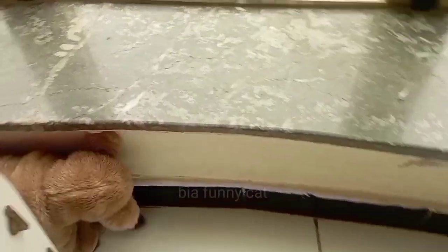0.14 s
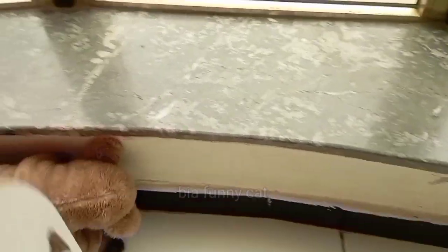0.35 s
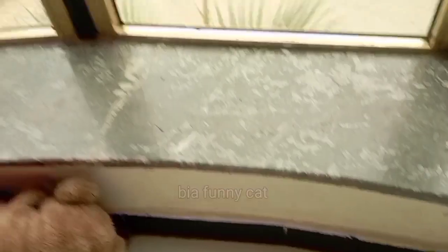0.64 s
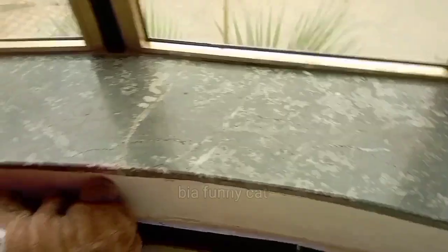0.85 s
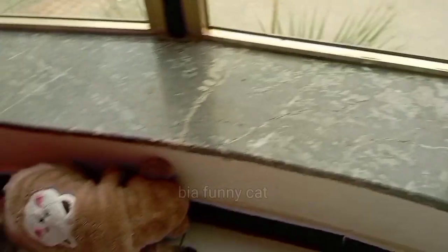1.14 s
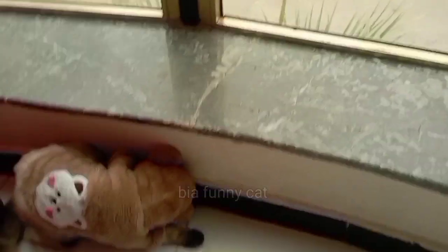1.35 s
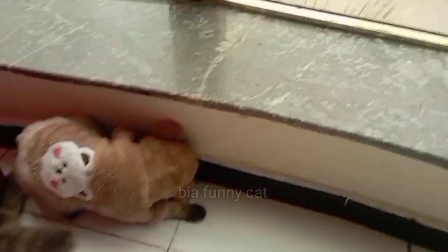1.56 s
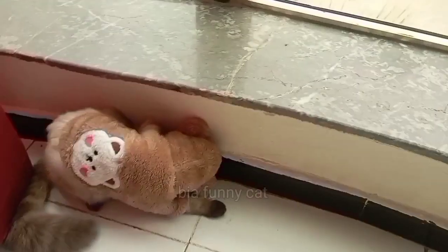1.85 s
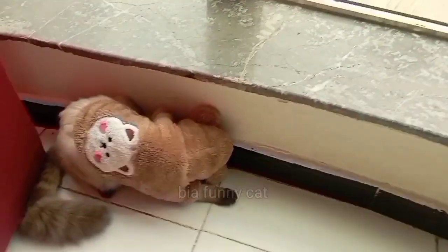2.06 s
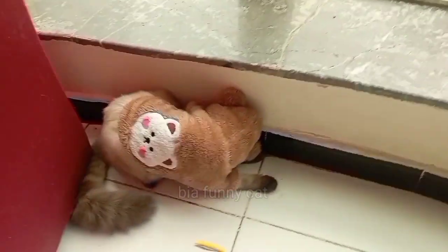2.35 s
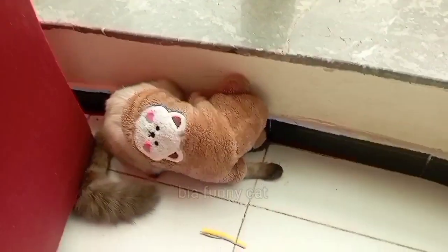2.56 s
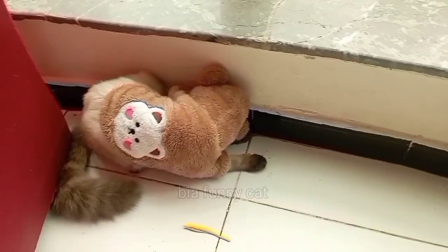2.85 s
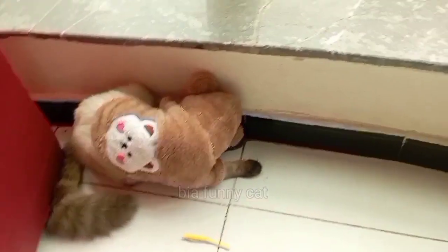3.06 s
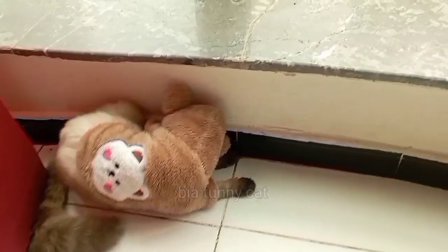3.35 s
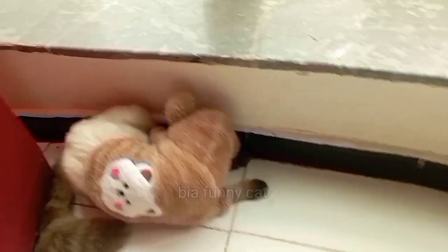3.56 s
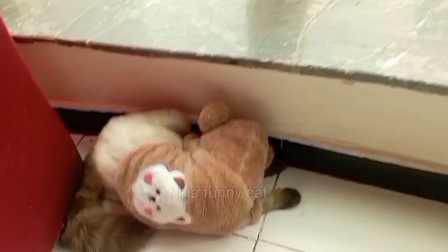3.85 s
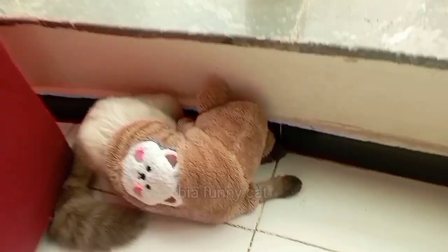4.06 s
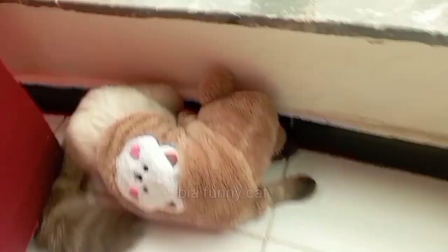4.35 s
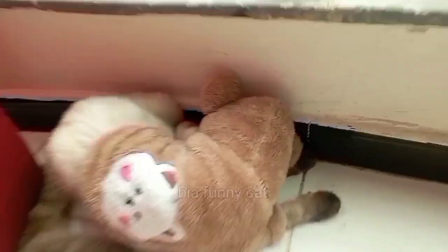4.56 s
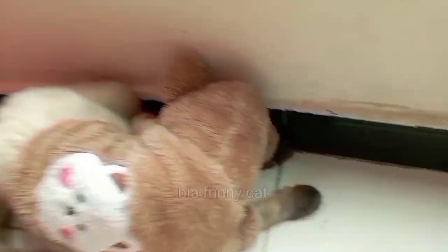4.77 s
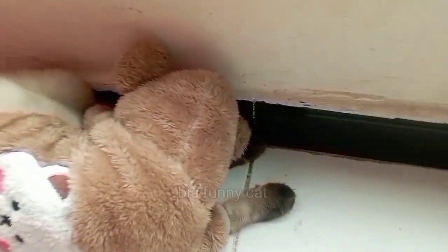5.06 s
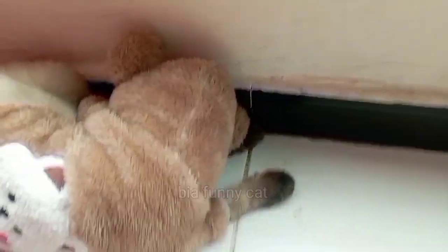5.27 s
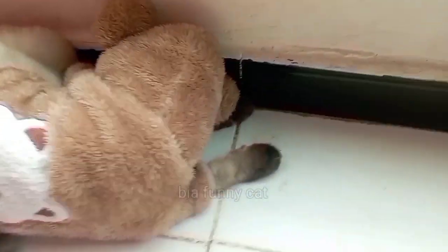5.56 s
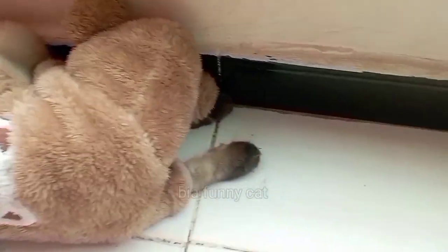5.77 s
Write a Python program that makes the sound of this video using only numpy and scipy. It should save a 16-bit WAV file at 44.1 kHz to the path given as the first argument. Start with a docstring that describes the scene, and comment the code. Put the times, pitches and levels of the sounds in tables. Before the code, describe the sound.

A cat paws and scuffs at a wall indoors, with soft thuds, claw ticks, a small toy bouncing on tile and microphone bumps.

```python
"""A cat pawing at a wall

A cat in a plush coat reaches into a gap at the foot of a wall: paws thud on the skirting and scuff,
claws tick, fur and flank rub. A small light toy drops and bounces on the tiles, and the hard room
reverberates briefly. A finger half covers the hand-held phone's right port, shading and bumping it."""
import sys
import numpy as np
from scipy import signal
from scipy.fft import rfft, irfft
from scipy.io import wavfile
from scipy.ndimage import uniform_filter1d

SR = 44100
rng = np.random.default_rng(int(sys.argv[2]) if len(sys.argv) > 2 else 0)


def store_pcm(level_fs):
    """Save levels as 16-bit WAV."""
    pcm = np.round(np.clip(level_fs, -1, 1) * 32767).astype(np.int16)
    wavfile.write(sys.argv[1], SR, np.atleast_2d(pcm).T)


N = 261072
TIME = np.arange(N) / SR
RING = 4096  # samples in one impulse response
BINS_HZ = np.fft.rfftfreq(RING, 1 / SR) + 1


def undb(db):
    """Decibels to amplitude ratio."""
    return 10 ** (np.asarray(db) / 20)


def unit(x):
    """Scale to rms 1."""
    return x / np.sqrt(np.mean(x ** 2))


def along(points, size, column=1):
    """Interpolate a table column over log frequency at the bins of an FFT."""
    points = np.array(points)
    bins_hz = np.fft.rfftfreq(size, 1 / SR) + 1
    return np.interp(np.log(bins_hz), np.log(points[:, 0]), points[:, column])


def colour(x, spectrum):
    """Zero-phase filtering gives a steady sound its spectrum."""
    return irfft(rfft(x) * undb(along(spectrum, N)), N)


def noise(spectrum):
    """Filtered Gaussian noise of rms 1."""
    return unit(colour(rng.standard_normal(N), spectrum))


def response(spectrum, shape_db=0):
    """Minimum-phase impulse response with this spectrum plus shape_db."""
    cepstrum = irfft(np.log(undb(along(spectrum, RING) + shape_db)))
    cepstrum[1:RING // 2] *= 2
    cepstrum[RING // 2 + 1:] = 0
    return irfft(np.exp(rfft(cepstrum)))


def resonance(hz, width, peak_db):
    """A resonance peak in dB; its width is a fraction of its frequency."""
    return peak_db / (1 + (2 * np.log(BINS_HZ / hz) / width) ** 2)


def through(x, ring):
    """Convolution: x drives a linear system."""
    return signal.fftconvolve(x, ring)[:len(x)]


def walk(rate_hz):
    """Smooth random fluctuation of rms 1."""
    size = int(SR / rate_hz)
    steps = np.repeat(rng.standard_normal(N // size + 1), size)[:N]
    return unit(uniform_filter1d(steps, size))


def contact(slip_s, slip_db):
    """Stick-slip force: one impulse, then a train of tiny slips that swells and dies."""
    age = np.arange(RING) / (SR * slip_s)
    chance = rng.standard_normal(RING)
    slips = chance * np.abs(chance) * np.sqrt(age) * np.exp(-age)
    force = undb(slip_db) * slips / np.linalg.norm(slips)
    force[0] += 1
    return force


def add(track, start_s, level_db, sound):
    """Place a transient; its level is its energy spread over 10 ms."""
    start = int(start_s * SR)
    sound = sound * undb(level_db) * np.sqrt(SR / 100) / np.linalg.norm(sound)
    track[start:start + RING] += sound[:N - start]


def air(level_db):
    """Ambient noise: the steady, low background of a quiet room."""
    # background spectrum: frequency_hz, gain_db
    spectrum = [(20, -17), (60, -9.5), (140, 5.5), (230, -11.5), (350, -9), (550, -16), (900, -29.5),
                (2000, -33.5), (6000, -41.5), (15500, -47)]
    return undb(level_db) * noise(spectrum)


def rubbing(column, release_s, fidget_db, attack_s=0.036, pause_db=-10, pause_fade_s=0.08):
    """Friction envelope: the cat's reaches add in power to its fidgeting, which fades in the pauses."""
    # reaches into the gap, at relative levels: start_s, length_s, fur_db, body_db
    reaches = [(0, .05, -63, -50.5), (0.055, 0.055, -58, -45.5), (0.276, 0.3, -62, -54.5),
               (0.538, 0.092, -56.5, -42), (.85, 0.25, -62.5, -39.5), (1.166, 0.091, -59, -37.5),
               (1.406, 0.069, -62, -53), (1.518, 0.11, -56, -43), (1.713, 0.17, -56, -50),
               (2.537, 0.049, -64.5, -41), (2.748, 0.023, -63, -38.5), (2.97, 0.046, -60.5, -40),
               (3.2, 0.073, -68.5, -57), (3.62, 0.047, -64, -56), (4.1, 0.17, -68.5, -68),
               (4.614, 0.11, -67.5, -59.5), (5.466, 0.052, -65, -74)]
    # the cat keeps still: start_s, end_s
    pauses = [(2.02, 2.415), (5.37, 5.44), (5.61, 5.73)]
    still = sum(1. * ((TIME > start) & (TIME < end)) for start, end in pauses)
    power = undb(fidget_db + pause_db * uniform_filter1d(still, int(pause_fade_s * SR))) ** 2
    for reach in reaches:
        start_s, length_s = reach[:2]
        age = TIME - start_s
        attack = np.clip(1 + age / attack_s, 0, 1)
        release = np.exp(-np.maximum(age - length_s, 0) / release_s)
        power += (undb(reach[column]) * attack * release) ** 2
    return np.sqrt(power)


def fur(catches_per_s=200, spread_db=4, flicker_db=2, grain_db=-3):
    """Friction noise: fibres catch and let go at random over a smooth hiss."""
    # hiss of the coat: frequency_hz, gain_db
    spectrum = [(400, -4), (1200, -2), (3200, -1), (5800, -4), (8500, -5), (10600, 0), (12500, -4.5),
                (15500, -5)]
    sizes = undb(spread_db * np.minimum(rng.exponential(size=N), 3))
    catches = (rng.random(N) < catches_per_s / SR) * sizes * rng.choice([-1, 1], N)
    grains = through(catches, contact(slip_s=0.0008, slip_db=3))
    friction = rng.standard_normal(N) + undb(grain_db) * unit(grains)
    hiss = unit(colour(friction, spectrum)) * undb(flicker_db * walk(45))
    return hiss * rubbing(column=2, release_s=0.04, fidget_db=-69)


def scattered_fur():
    """Scattering off wall and floor carries the coat's hiss to the shaded port."""
    # scattered path: frequency_hz, gain_db
    path = [(1000, 2.1), (3500, 5.9), (7000, 6.9), (10500, 0.5), (15000, 7.1)]
    return colour(fur(), path)


def shuffle(flicker_db=2.5):
    """Sliding friction: the cat's body drags unevenly along the skirting."""
    # rub of the flank: frequency_hz, gain_db
    spectrum = [(40, -10.5), (130, 0), (250, 3.5), (400, -2), (600, -5), (850, -17.5), (1500, -27),
                (3000, -40), (8000, -56.5)]
    drag = noise(spectrum) * undb(flicker_db * walk(35))
    return drag * rubbing(column=3, release_s=0.075, fidget_db=-65.5)


def hand(rest_db=-55.5, wander_db=2, squeeze_sigma_s=0.049, flicker_db=2.5, gain_db=2.5):
    """Structure-borne rumble follows the grip, which wanders slowly and swells at each squeeze."""
    # rumble of the hand: frequency_hz, gain_db
    spectrum = [(20, -30), (45, -1), (85, 0.5), (125, 0), (190, -8.5), (300, -23), (550, -36.5),
                (1000, -45), (4000, -58.5)]
    # the hand tightens: peak_s, relative_level_db
    squeezes = [(.33, -48.5), (.57, -49), (.86, -47), (1.22, -45), (1.47, -48), (2.3, -53.5), (2.5, -50),
                (3.42, -38.5), (3.9, -51.5), (4.57, -46.5), (5.08, -52.5), (5.7, -50)]
    rumble = noise(spectrum)
    swells = sum(undb(db) * np.exp(-0.5 * ((TIME - s) / squeeze_sigma_s) ** 2) for s, db in squeezes)
    grip = np.hypot(undb(rest_db + wander_db * walk(10)), swells)
    return rumble * grip * undb(gain_db + flicker_db * walk(25))


def finger(lag_hz=600):
    """Stick-slip of skin at the right port presses low bumps into it, over the hand's rumble."""
    # finger contacts: start_s, level_db, tilt_db_per_octave, cutoff_hz
    bumps = [(0.278, -36.5, -5, 500), (.317, -33, -0.5, 450), (.554, -35, -2, 496), (1.126, -42, 7.5, 450),
             (1.138, -39.5, 2.5, 860), (1.214, -42, 1, 504), (1.71, -36.5, -4.5, 500),
             (2.013, -41, -5.5, 350), (2.442, -35, 3.5, 670), (2.602, -19, -0.5, 940),
             (3.33, -39.5, 1, 600), (3.389, -16, -2, 950), (3.43, -34, 2, 820), (3.446, -25, -1, 680),
             (3.484, -42, -0.5, 1160), (3.757, -37.5, -9, 298), (3.846, -39.5, 0, 780),
             (4.023, -37.5, -1, 1830), (4.082, -39.5, -1, 1600), (4.128, -48, 2, 1490),
             (4.176, -45, 3.5, 850), (4.233, -36.5, 2, 800), (4.244, -48.5, 3, 1620), (4.258, -8, -1, 2700),
             (4.308, -20, -4, 980), (4.501, -34, -0.5, 550), (4.575, -28, 2, 440), (4.656, -12, -2, 2000),
             (4.84, -43.5, 1.5, 600), (4.886, -37, 0, 350), (5.673, -47.5, 4.5, 700),
             (5.705, -40, 5.5, 500)]
    # pressure pulse in the port: frequency_hz, gain_db
    spectrum = [(20, -66.5), (45, -19), (75, -6), (98, 1), (125, 1.5), (155, -4.5), (200, -11),
                (320, -13.5), (500, -21.5), (700, -30.5), (1400, -34), (2600, -43.5), (4200, -58),
                (15000, -99.5)]
    out = hand()
    for start_s, level_db, tilt, cutoff_hz in bumps:
        softness_db = -10 * np.log10(1 + (BINS_HZ / cutoff_hz) ** 8)
        add(out, start_s, level_db, response(spectrum, tilt * np.log2(BINS_HZ) + softness_db))
    # all-pass delay: the fingertip gives way, so the low push comes just after the first touch
    pole = np.exp(-2 * np.pi * lag_hz / SR)
    return signal.lfilter([pole, -1], [1, -pole], out)


def paws(longest_slip_s=0.0078, doubling_db=19, pad_hz=650):
    """Cushioned impact: a soft pad low-passes each thud, then skids, longer after harder blows."""
    # blows on skirting and floor: start_s, level_db, tilt_db_per_octave, pitch_hz
    blows = [(0.085, -48.5, 4, 312), (0.157, -46, 2, 400), (0.369, -48.5, 1, 263), (0.496, -41.5, -1, 580),
             (0.539, -40.5, -3.5, 243), (.585, -45, 3, 254), (0.742, -37.5, -1, 247), (0.873, -49, -7, 300),
             (0.919, -39.5, -0.5, 194), (0.996, -36.5, -3, 243), (1.035, -40.5, -4, 250),
             (1.185, -38.5, -1.5, 256), (1.248, -33, 1, 322), (1.261, -39.5, -11.5, 109),
             (1.522, -38.5, -9, 278), (1.563, -35, 0.5, 405.5), (1.624, -46, -5.5, 230),
             (1.713, -42.5, 5.5, 302), (2.494, -41, 3, 303), (2.506, -33.5, -0.5, 315),
             (2.735, -31, 2, 275), (2.743, -30.5, -6, 161), (2.769, -36.5, -1, 183), (2.783, -39, 1.5, 247),
             (2.969, -27, 1, 233), (2.978, -34.5, 0, 240), (3.012, -33.5, -0.5, 239),
             (3.142, -41.5, -1.5, 480), (3.226, -41.5, 0, 410), (3.658, -46, 3.5, 420)]
    # response of the skirting: frequency_hz, gain_db
    skirting = [(12, -74.5), (40, -38.5), (110, -12), (220, -4), (310, -4.5), (430, -6.5), (570, -4),
                (760, -9.5), (1300, -20.5), (2500, -30), (5000, -40.5), (15000, -50)]
    out = np.zeros(N)
    padding_db = -10 * np.log10(1 + (BINS_HZ / pad_hz) ** 4)
    hardest_db = max(blow[1] for blow in blows)
    for start_s, level_db, tilt, pitch_hz in blows:
        spot_db = tilt * np.log2(BINS_HZ) + resonance(pitch_hz, width=0.31, peak_db=10.5)
        thud = response(skirting, spot_db + padding_db)
        slip_s = longest_slip_s * 2 ** ((level_db - hardest_db) / doubling_db)
        skid = through(contact(slip_s, slip_db=9), response(skirting, spot_db))
        add(out, start_s, level_db, unit(thud) + unit(skid))
    return out


def scuffs():
    """Stick-slip friction: brief dry scrapes of a paw, each with its own pitch."""
    # paw scrapes: start_s, level_db, pitch_hz
    scrapes = [(0.088, -54.5, 1390), (0.37, -63, 2980), (0.742, -56.5, 750), (0.873, -52.5, 1230),
               (0.923, -51.5, 1420), (.937, -54, 1400), (0.994, -51, 1790), (1.247, -52.5, 715),
               (1.52, -41.5, 3450), (1.562, -45, 1080), (1.621, -42, 3700), (1.715, -46.5, 2780),
               (2.507, -46, 1420), (2.737, -51, 1720), (3.138, -55.5, 1140), (4.169, -60, 1440),
               (4.59, -57, 1900), (4.661, -58.5, 3260), (4.71, -61, 2720), (4.762, -53.5, 2680),
               (4.831, -61, 1100), (4.943, -52, 2450), (5.236, -63, 4570)]
    # spectrum of a scrape: frequency_hz, gain_db
    spectrum = [(300, -9), (900, -3), (1700, -6.5), (2600, -13), (3900, -13), (5500, -21), (10000, -20),
                (15000, -38.5)]
    out = np.zeros(N)
    for start_s, level_db, pitch_hz in scrapes:
        ring = response(spectrum, resonance(pitch_hz, width=0.3, peak_db=10))
        add(out, start_s, level_db, through(contact(slip_s=0.0051, slip_db=11), ring))
    return out


def claws(gain_db=-3.5):
    """Hard impact: the brief sliding contact of claw on tile gives a tick."""
    # claw strikes: start_s, relative_level_db
    ticks = [(.101, -54.5), (.349, -50.5), (.368, -50), (.4958, -33), (.4982, -31.5), (.542, -39),
             (.588, -49.5), (.63, -48), (.818, -53.5), (.839, -51), (.875, -54), (.994, -62),
             (1.247, -49.5), (1.521, -28.5), (1.623, -55), (1.723, -46.5), (2.496, -52.5), (2.734, -56),
             (2.977, -42.5), (3.418, -63), (3.479, -60.5), (5.24, -58.5), (5.287, -64), (5.36, -63.5),
             (5.498, -53), (5.527, -53.5), (5.547, -57.5), (5.593, -61), (5.787, -64), (5.812, -62),
             (5.877, -70)]
    # spectrum of a bright claw tick as heard at the left port: frequency_hz, gain_db
    spectrum = [(300, -27), (1500, -6), (3200, -10), (6000, -8.5), (8200, -2), (9800, 9), (11200, 6.5),
                (12500, 2.5), (15500, -12.5)]
    ring = response(spectrum)
    out = np.zeros(N)
    for start_s, level_db in ticks:
        add(out, start_s, level_db + gain_db, through(contact(slip_s=0.0021, slip_db=15), ring))
    return out


def toy(dulling_db_per_db=0.39):
    """Impact: each bounce gives a dry crack, a ring near 1 kHz and bright peaks; weak hops are duller."""
    # the toy lands on both ends, then hops: start_s, level_db
    hops = [(1.7422, -24.5), (1.744, -26), (1.8145, -35), (1.8774, -42), (1.9275, -55)]
    # peaks in the bounce's clack: frequency_hz, bandwidth_hz, peak_db
    peaks = [(1072, 77, 3.5), (2890, 99, 2), (3520, 220, 2.5), (4450, 300, -2), (6980, 400, 9),
             (7720, 160, 5), (8140, 180, 9.5), (10130, 2600, 8), (12300, 300, 2), (14200, 770, -10)]
    # crack of the impact: frequency_hz, gain_db
    crack = [(300, -12), (1000, -6.5), (1450, -17), (2500, -7), (4200, 5), (5400, -4), (6800, -4.5),
             (10500, 11.5), (12500, 1), (15500, -19)]
    t = TIME[:RING]
    ringing = np.zeros(RING)
    for k, (frequency_hz, bandwidth_hz, peak_db) in enumerate(peaks):
        decay = undb(peak_db) * bandwidth_hz * np.exp(-np.pi * bandwidth_hz * t)
        ringing += (-1) ** k * decay * np.sin(2 * np.pi * frequency_hz * t)
    clack = unit(ringing) + unit(response(crack))
    out = np.zeros(N)
    hardest_db = max(hop[1] for hop in hops)
    for start_s, level_db in hops:
        treble_db = dulling_db_per_db * (level_db - hardest_db)
        softness = response([(1000, 0.00077), (10000, treble_db)])
        force = through(contact(slip_s=0.00089, slip_db=-6), softness)
        add(out, start_s, level_db, through(force, clack))
    return out


def room(x, column, build_s=0.0017, size=256):
    """Diffuse reverberation of tile and glass at one port; the middle frequencies last longest."""
    # reverberation: frequency_hz, left_gain_db, right_gain_db, t60_s
    bands = [(80, -0.5, -9.5, 0.17), (242, 2, -13.5, 0.59), (592, -6.5, -20, 0.71), (1200, -5, -26, 0.65),
             (3425, -12, -17.5, 0.53), (7000, -16.5, -26.5, .5), (10500, -12.5, -33, 0.35),
             (15000, -23, -18.5, 0.26)]
    _, t, cells = signal.stft(rng.standard_normal(SR), SR, nperseg=size)
    t60_s = along(bands, size, column=3)[:, None]
    fade = np.exp(-np.log(1000) * t / t60_s) * (1 - np.exp(-t / build_s))
    fade /= np.sqrt(SR * np.mean(fade ** 2, axis=1, keepdims=True))
    gain = undb(along(bands, size, column))[:, None]
    tail = signal.istft(cells * fade * gain, SR)[1]
    return through(x, tail)


def shaded(x):
    """Acoustic shadowing: the finger over the port blocks more treble than bass."""
    # transmission of the half-covered port: frequency_hz, gain_db
    transmission = [(60, -7), (230, -5.5), (500, -12.5), (1200, -19.5), (3500, -23.5), (7000, -25),
                    (10500, -37.5), (15000, -20)]
    return through(x, response(transmission))


def scene():
    """Superposition at two ports: the left is open; the right is shaded, with the finger on top."""
    direct = claws() + paws() + scuffs() + toy() + undb(-1) * fur() + undb(-7) * shuffle()
    scattered = undb(-10.5) * scattered_fur()
    left = direct + room(direct, column=1) + air(level_db=-58.5)
    right = shaded(direct) + room(direct, column=2) + scattered + finger() + air(level_db=-62)
    return np.array([left, right])


def record(dry):
    """Band limiting: the phone's steep low-pass filter cuts the highest treble."""
    cutoff_hz = 15400
    return signal.sosfilt(signal.ellip(10, 0.2, 80, cutoff_hz, fs=SR, output="sos"), dry)


dry = scene()
out = record(dry)
store_pcm(out)
```